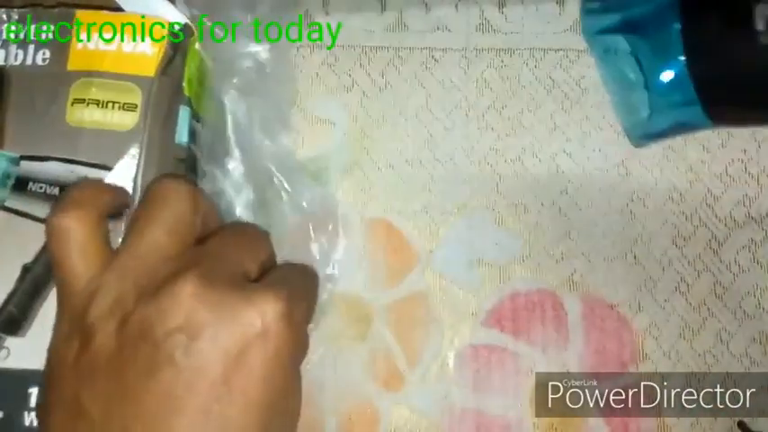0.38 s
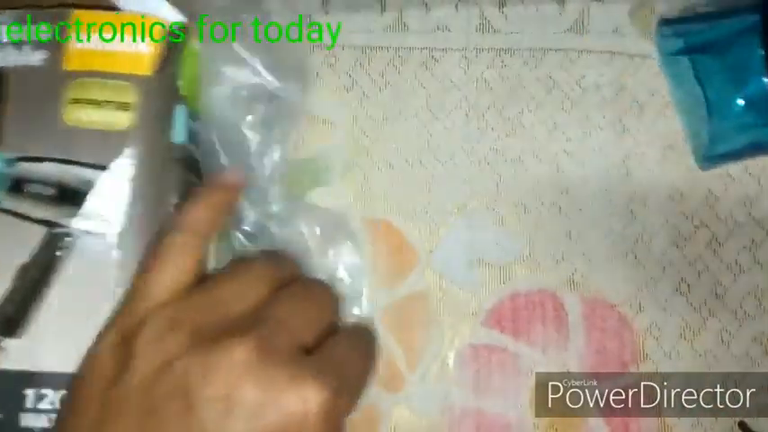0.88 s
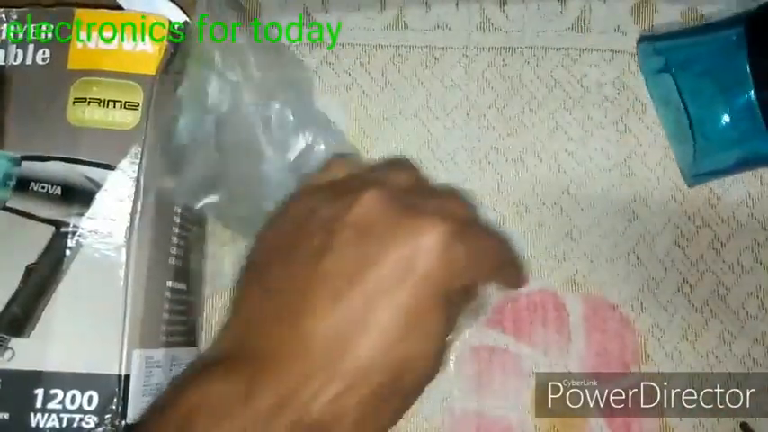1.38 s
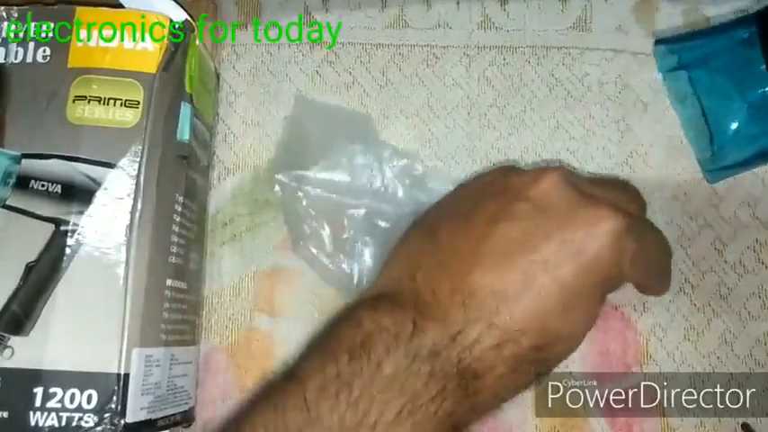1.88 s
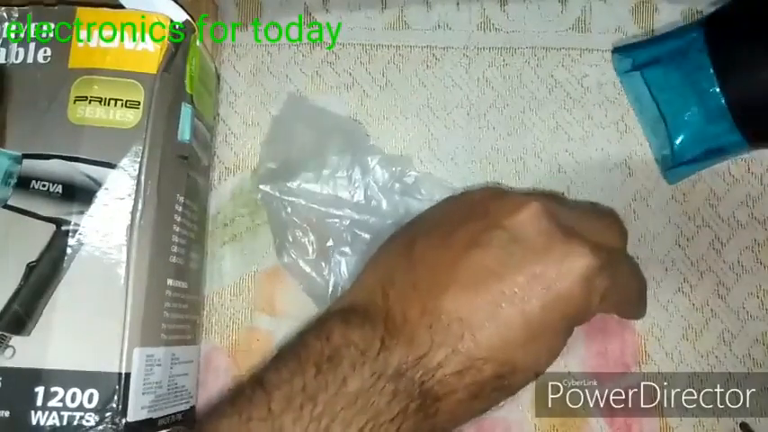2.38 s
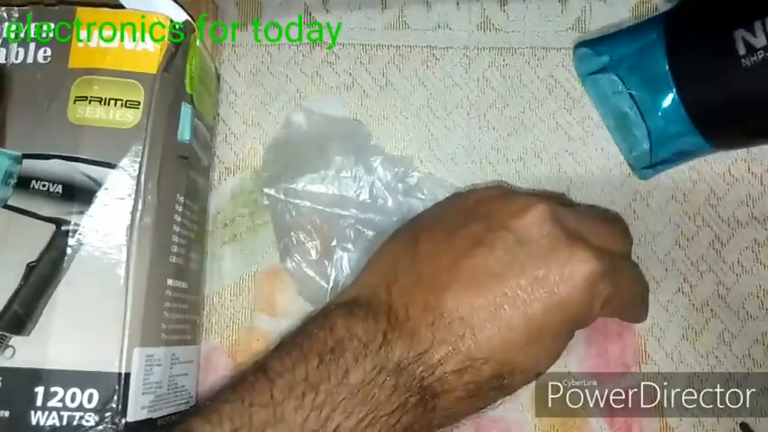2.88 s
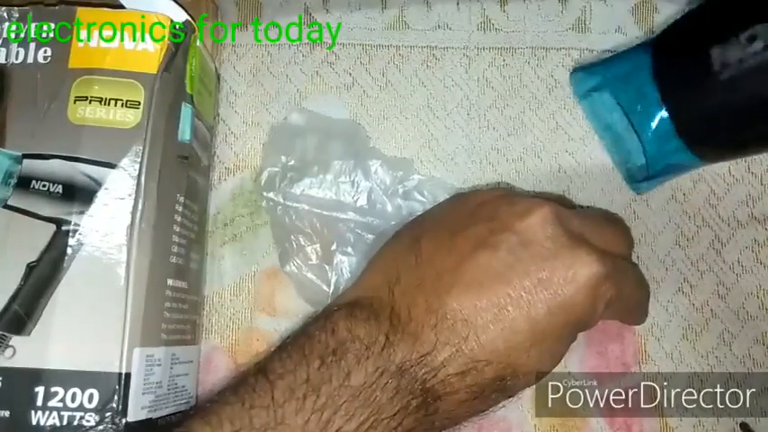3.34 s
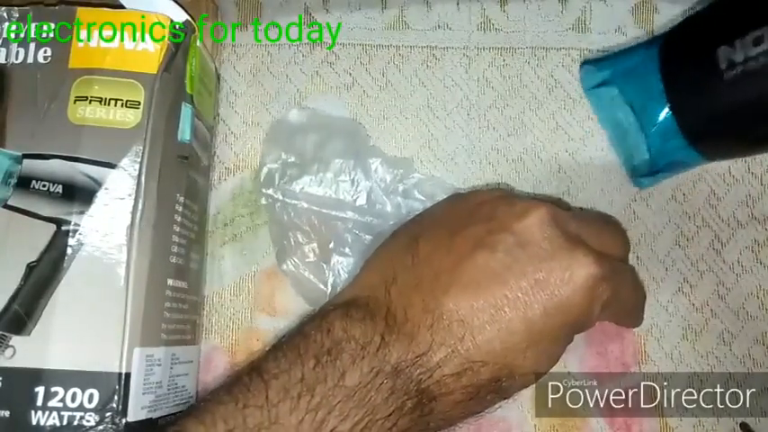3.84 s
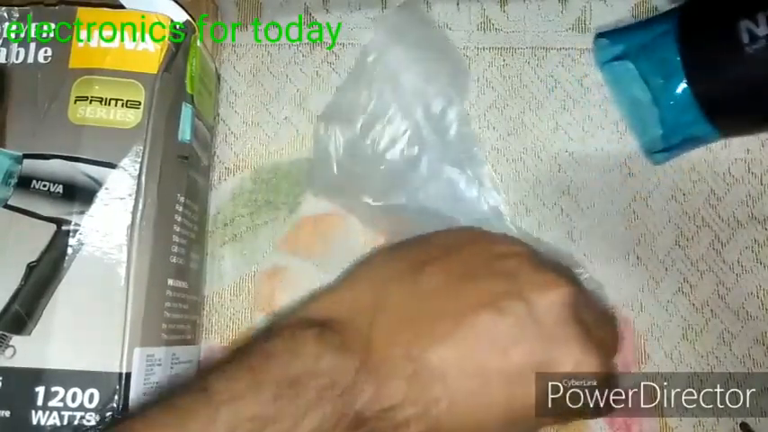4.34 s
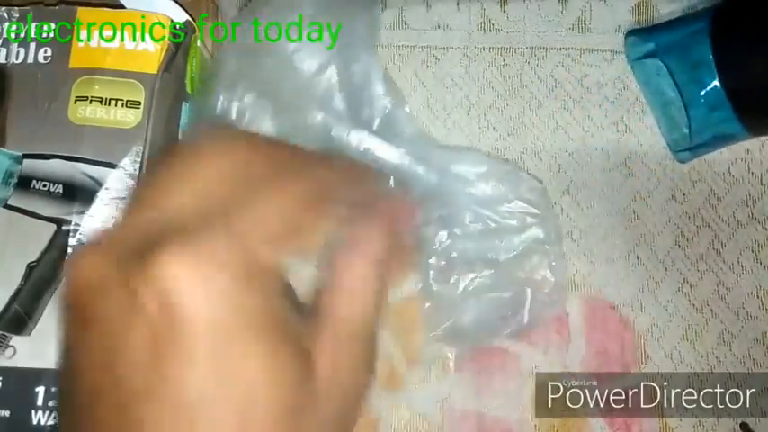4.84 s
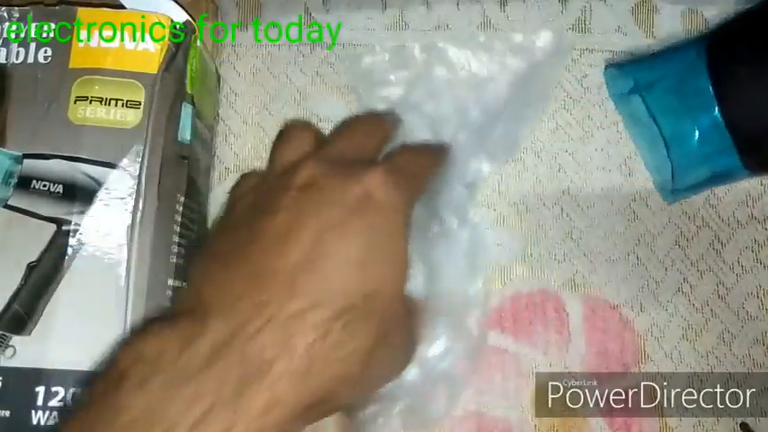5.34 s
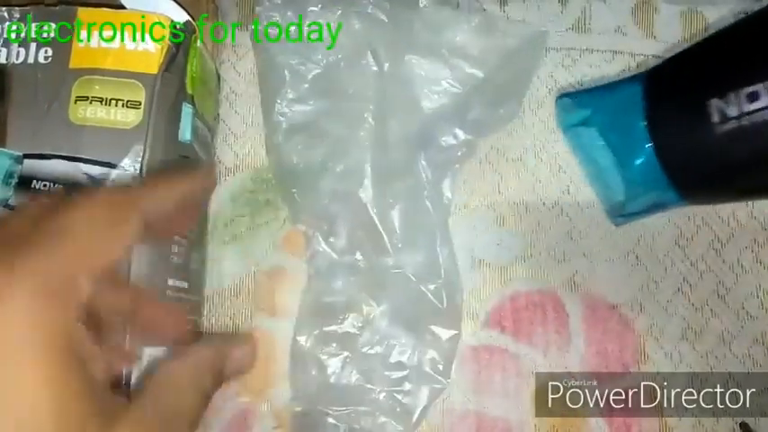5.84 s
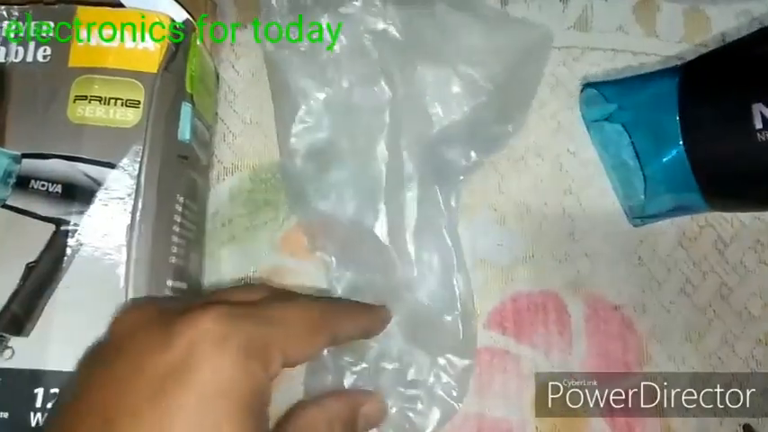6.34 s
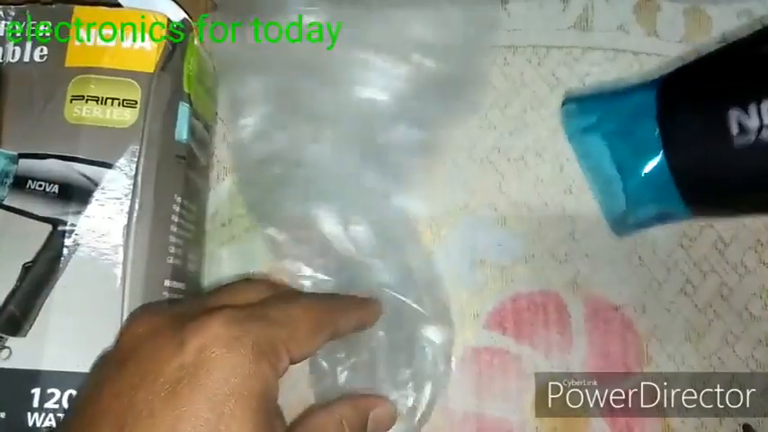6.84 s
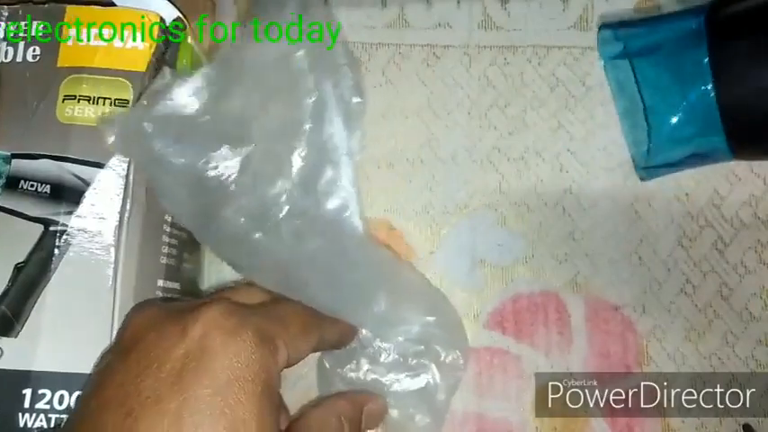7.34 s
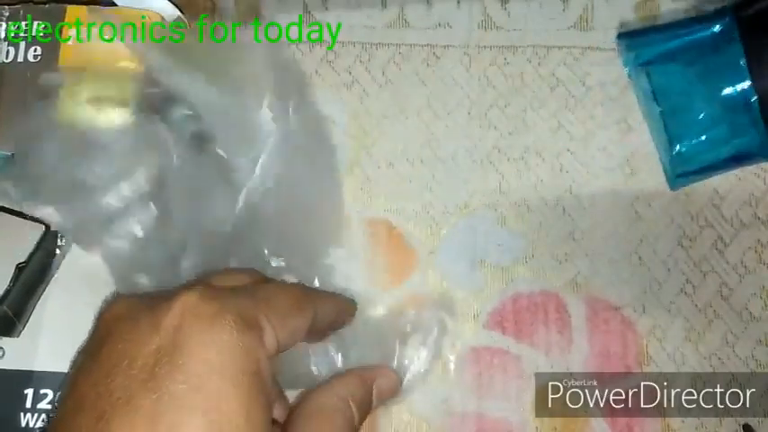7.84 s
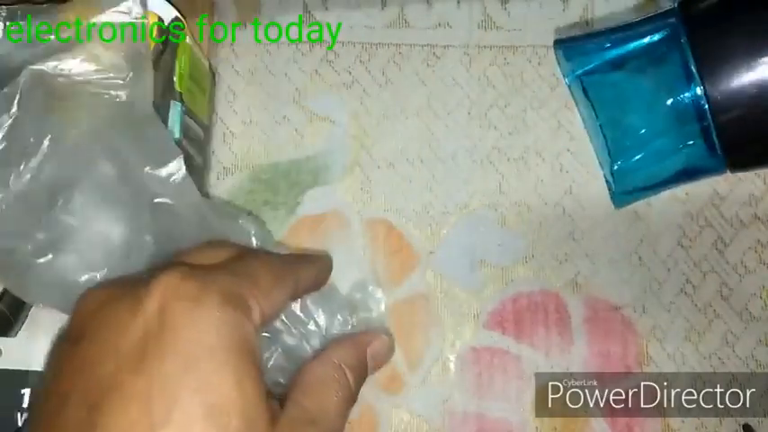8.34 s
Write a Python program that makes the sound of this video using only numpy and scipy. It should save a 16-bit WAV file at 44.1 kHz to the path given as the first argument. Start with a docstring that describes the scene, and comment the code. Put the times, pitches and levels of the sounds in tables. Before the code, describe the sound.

A hair dryer roars close by with a thin high whine, shuts off and winds down, plastic crinkles, then it clicks back on.

```python
"""Hair dryer and plastic bag

A hand-held hair dryer runs close to a two-port phone microphone in a small room, is switched off, coasts down,
and clicks on again. Fan speed drives shaft and blade tones and turbulent noise through barrel resonances.
In the pause a hand crumples a thin plastic bag: dense noise grains with snapping creases.
Low-noise gusts buffet the ports over a quiet room tone, faint hum and rumble."""
import sys
import numpy as np
from scipy import signal
from scipy.fft import rfft, irfft
from scipy.io import wavfile
from scipy.ndimage import uniform_filter1d, map_coordinates

SR = 44100
rng = np.random.default_rng(int(sys.argv[2]) if len(sys.argv) > 2 else 0)


def digitize_waveform(pressure):
    """Quantize a signal to 16-bit integers and store it at the path in sys.argv[1].

    Rows of a 2-D input are taken as channels; values are limited to [-1, 1].
    """
    field = np.atleast_2d(pressure).T
    bounded = np.clip(field, -1, 1)
    quanta = np.round(bounded * 32767).astype(np.int16)
    wavfile.write(sys.argv[1], SR, quanta)


def nominal_scale(level):
    """Amplitude ratio for a level in decibels (scalar or array-like)."""
    x = np.asarray(level, float) / 20
    return 10 ** x


N = 373086
TIME = np.arange(N) / SR

# the hand moves the dryer: (t/s, nearness/dB, nozzle turned to the phone/dB, fan blades in view of the phone/dB)
HAND = [(0, 2, -3, 4), (.5, 0, -3.5, -4), (1.2, -.5, 0.5, 0), (1.7, 0, -3, 2.5), (2.4, -1, 2, 4.5),
        (3.2, 0.5, -.5, 0.5), (3.8, -.5, 0, 1), (6.8, 0, 0, 0.5), (7.25, 0, 1, 3), (7.6, 0, -3, -2),
        (8.46, 0, -.5, -9)]
# colour of the plastic film: (f/Hz, relative level per Hz/dB)
BAG_COLOUR = [(350, -32), (600, -12.5), (1420, -11.5), (2590, -8.5), (3310, -10.5), (3750, -8), (6840, -9),
              (11000, -1.5), (15800, -10)]
# quiet room at the two ports: (f/Hz, likeness 0-1, left minus right/dB, left lead/ms)
ROOM_PORTS = [(60, 0.95, -1, 0.0065), (300, .8, .5, 0.0034), (700, 0.6, 0.95, 0), (2000, 0.2, 1.5, 0.0094)]


def on_log(table, hz):
    """Columns of a table, read on a log-frequency axis."""
    f, *columns = np.transpose(table)
    return [np.interp(np.log(hz + 1), np.log(f), c) for c in columns]


def level(x, db):
    """Scale to an rms level."""
    return x * nominal_scale(db) / np.sqrt(np.mean(x ** 2))


def sides(pan_db):
    """Left and right gains that differ by pan_db."""
    return nominal_scale(np.array([pan_db, -pan_db]) / 2)


def ports(x, other, table):
    """Right hears a late copy of left mixed with unrelated sound."""
    hz = np.arange(N // 2 + 1) * SR / N
    like, pan_db, lead_ms = on_log(table, hz)
    like = np.clip(like, 0, 1)
    left = rfft(x)
    late_copy = left * np.exp(-2j * np.pi * hz * lead_ms / 1000)
    right = like * late_copy + np.sqrt(1 - like ** 2) * rfft(other)
    return irfft(np.array([left, right]) * sides(pan_db), N)


def shape(x, gain_db, size=512):
    """Filter whose gain in dB depends on frequency and time."""
    overlap = size * 3 // 4
    hz, t, z = signal.stft(x, SR, nperseg=size, noverlap=overlap)
    z = z * nominal_scale(gain_db(hz[:, None], t))
    return signal.istft(z, SR, nperseg=size, noverlap=overlap)[1][..., :N]


def walk(rate):
    """Random levels held 1 / rate s and slewed twice, with a spread of 1."""
    k = int(SR / rate)
    held = np.repeat(rng.standard_normal(N // k + 1), k)
    v = uniform_filter1d(uniform_filter1d(held, k), k)[:N]
    return v / v.std()


def cells(hz, t, band_hz, hold_s, shared):
    """Smooth random field over frequency and time for each port, part of it common to both."""
    grid = rng.standard_normal((3, int(SR / 2 / band_hz) + 2, int(N / SR / hold_s) + 3))
    grid = np.sqrt(shared) * grid[0] + np.sqrt(1 - shared) * grid[1:]
    at = np.broadcast_arrays(hz / band_hz, t / hold_s)
    # 1.4 makes up for the spread lost between grid points
    return 1.4 * np.array([map_coordinates(g, at, order=1) for g in grid])


def low_noise(low_hz, high_hz, x):
    """Band of low noise at unit rms."""
    band = signal.butter(2, [low_hz, high_hz], "bandpass", fs=SR, output="sos")
    return level(signal.sosfilt(band, x), 0)


def speed():
    """Share of full fan speed: exponential run-up under power, slowed by air drag and friction when off."""
    # switch moves: (t/s, on 1 or off 0)
    moves = [(-.28, 1), (3.8, 0), (6.775, 1)]
    spin_up_s, coast_s = .13, .23
    brush_drag = .3  # share of full speed lost per second to brush friction
    share, now = np.zeros(N), 0.
    for (start, on), (end, _) in zip(moves, moves[1:] + [(N / SR, 0)]):
        during = (TIME >= start) & (TIME < end)
        t = np.append(TIME[during], end) - start
        if on:
            part = 1 - (1 - now) * np.exp(-t / spin_up_s)
        else:
            part = np.maximum(now / (1 + t / coast_s) - brush_drag * t, .01)
        share[during], now = part[:-1], part[-1]
    return share


def rush_of_air(share):
    """Turbulent noise through the barrel resonances, growing as a power of fan speed."""
    # overall colour: (f/Hz, relative level per Hz/dB)
    colour = [(60, -44), (140, -25.5), (240, -17), (400, -10.5), (620, -14.5), (1500, -9.5), (2600, -7),
              (4000, -5.5), (6000, -10), (9000, -7.5), (12000, -8.5), (15000, -10.5), (17000, -26.5)]
    # air resonances of barrel and housing, the last one a dip: (f/Hz, width/Hz, gain/dB)
    barrel = [(864.6, 159, 13.5), (1083, 296, 11.5), (1937, 210, 4), (2600, 450, 6.5), (3585, 77, 4.5),
              (4960, 63, 10), (5530, 200, 6), (6370, 200, 7.5), (7290, 190, 4.5), (9910, 230, 2.5),
              (10900, 1600, 4), (13300, 300, -4.5)]
    # amplitude grows with speed, steeper in the treble: (f/Hz, power)
    speed_law = [(300, 1.6), (1000, 2.11), (2500, 3.04), (10000, 3.2)]
    # the dryer at the two ports: (f/Hz, likeness 0-1, left minus right/dB, left lead/ms)
    air_ports = [(100, 0.17, 2.5, 0.069), (424, 0.93, 3.5, 0.021), (650, 0.2, 1.5, 0.15), (890, 1, 4, 0.23),
                 (1180, 0.94, 6.5, 0.18), (1660, 0.5, -2, 0.18), (2070, 0, 2.5, 0.26), (2570, 0, 4.5, 0.24),
                 (4170, 0.42, 1.5, 0.21), (6000, 0.29, 3.5, 0.29), (7500, 0.07, 2.5, 0.22),
                 (11000, .05, 5, 0.26), (15000, .05, 3.5, 0.18)]
    # shifting ripple of the colour, echoes off table and walls: (f/Hz, spread/dB)
    echo_ripple = [(1200, .5), (2000, 1.5), (3500, 2.2), (8000, 2.8), (15000, 2.8)]
    rush_db = -15  # rms over the whole scene, ahead of the hand's moves
    nozzle_hz, nozzle_width_hz = 2600, 440
    bright_db_per_octave = .5
    s, _, nozzle_db, _ = np.transpose(HAND)

    def air_db(hz, t):
        """Fixed colour, fan law, aim and echoes."""
        peaks = sum(db / (1 + (2 * (hz - f) / w) ** 2) for f, w, db in barrel)
        fan = 20 * on_log(speed_law, hz)[0] * np.log10(np.interp(t, TIME, share))
        tilt = bright_db_per_octave * np.log2((hz + 100) / 3000)
        aim = np.interp(t, s, nozzle_db) / (1 + (2 * (hz - nozzle_hz) / nozzle_width_hz) ** 2)
        ripple = on_log(echo_ripple, hz)[0] * cells(hz, t, 170, .45, .4)
        return on_log(colour, hz)[0] + peaks + fan + tilt + aim + ripple

    eddies = rng.standard_normal((2, N)) * nominal_scale(.5 * walk(40))
    return level(shape(ports(*eddies, air_ports), air_db, size=1024), rush_db)


def whine(share):
    """Sine tones at multiples of shaft speed, rising steeply with fan speed."""
    # tones: (multiple of shaft speed, rms level at full speed ahead of the hand's moves/dB,
    #         left minus right/dB, left lead/s)
    tones = [(1, -37, 2.5, 0), (5, -50.5, 2, 0.00079), (6, -34, 11.5, 0.0096)]
    # full shaft speed, and how much lower it lies on a cold motor
    full_speed_hz, cold_drop_hz, warm_up_s = 392.2, 4, 2
    s, _, _, blade_db = np.transpose(HAND)
    warm_hz = full_speed_hz - cold_drop_hz * np.exp(-TIME / warm_up_s)
    shaft_hz = share * warm_hz * (1 + .0005 * walk(25))
    turns = np.cumsum(shaft_hz) / SR
    blades_db = np.interp(TIME, s, blade_db)
    total = np.zeros((2, N))
    for multiple, db, pan_db, lead_s in tones:
        # the view of the blades leaves the shaft tone alone
        gain = nominal_scale(db + (multiple > 1) * blades_db + 1.2 * walk(9)) * np.sqrt(2)
        port_turns = turns - np.outer([0, lead_s], shaft_hz)
        total += sides(pan_db)[:, None] * gain * np.sin(2 * np.pi * multiple * port_turns)
    return total * share ** 6.4


def dryer():
    """Air rush and whine share one fan speed, and swell and sway as the hand moves the dryer."""
    share = speed()
    s, near_db, _, _ = np.transpose(HAND)
    sway_db = -.1 * walk(1.6)
    return (rush_of_air(share) + whine(share)) * nominal_scale(np.interp(TIME, s, near_db)) * sides(sway_db)


def thumps():
    """Low noise, unrelated at the two ports, stronger on the right."""
    return low_noise(20, 85, rng.standard_normal((2, N))) * sides(-6)[:, None]


def buffet():
    """Gusty low thumps of the air stream, growing with the fourth power of fan speed."""
    gust_db = -52 + 3.7 * np.array([walk(4.3), walk(10)])
    return thumps() * nominal_scale(gust_db) * speed() ** 4


def room_tone():
    """Quiet broadband noise with faint hum bands, partly alike at the two ports."""
    # (f/Hz, relative level per Hz/dB)
    colour = [(50, -13), (80, -9.5), (120, 0.5), (170, -19), (210, 2), (260, -9.5), (310, -4), (380, -17.5),
              (500, -9.5), (620, -24), (780, -16), (1000, -21.5), (2000, -27.5), (4000, -36),
              (10000, -39.5), (15500, -37)]
    noise = ports(*rng.standard_normal((2, N)), ROOM_PORTS)
    return level(shape(noise, lambda hz, t: on_log(colour, hz)[0], size=2048), -58)


def room_hum():
    """Faint sines that waver in level and pitch."""
    # (f/Hz, rms level around which it wavers/dB)
    tones = [(98, -71.5), (204.6, -72.5), (243, -76.5), (296, -70), (441, -79), (490, -78), (538, -79.5)]
    total = np.zeros(N)
    for hz, db in tones:
        cycles = hz * np.cumsum(1 + .006 * walk(6)) / SR
        total += nominal_scale(db + 1.8 * walk(4.1)) * np.sqrt(2) * np.sin(2 * np.pi * cycles)
    return total


def phone_rumble():
    """Low rumble of the phone in the hand, weaker while the dryer runs."""
    rumble_db, running_db, wander_db = -50.5, -2, .5
    low = low_noise(15, 55, ports(*rng.standard_normal((2, N)), ROOM_PORTS))
    return low * nominal_scale(rumble_db + running_db * speed() + wander_db * walk(3.6))


def grip(start, peak, end, db, sag):
    """Level of the film through one move: starts at once, swells to its peak, dies when the hand lets go."""
    swell_db = 8 * np.clip((peak - TIME) / (peak - start), 0, 1)
    let_go_db = 200 * np.maximum(TIME - end, 0)
    fall_db = sag * np.maximum(TIME - peak, 0) + let_go_db
    return (TIME >= start) * nominal_scale(db - swell_db - fall_db)


def hand_effort():
    """Summed power of the hand's moves, over film that keeps creeping between them."""
    # moves on the bag: (start t/s, peak t/s, end t/s, peak level/dB, sag after the peak/dB per s)
    grips = [(4.1, 4.12, 4.68, -46, 4), (4.42, 4.5, 4.56, -43, 40), (4.68, 4.7, 4.92, -55, 12),
             (4.928, 4.935, 5.1, -44, 5), (4.98, 5.055, 5.11, -39, 40), (5.1, 5.18, 5.3, -31, 45),
             (5.25, 5.3, 5.8, -39.5, 19), (5.8, 5.82, 6.06, -52, 35), (6.232, 6.236, 6.47, -47.5, 12),
             (6.64, 6.76, 6.78, -54, 5)]
    settle_db = -63
    moves = sum(grip(*move) ** 2 for move in grips)
    handled = (TIME > grips[0][0]) & (TIME < grips[-1][2])
    return np.sqrt(moves + handled * nominal_scale(settle_db) ** 2)


def film_rustle(effort):
    """Dense tiny crackles: noise whose level jumps at every sample, swelling with each move of the hand."""
    low_db, pan_db = -2.5, .5
    crackle_db = 1.8 * rng.exponential(size=N) + 2.1 * walk(150) + 1.1 * walk(30)
    grains = rng.standard_normal((2, N)) * nominal_scale(crackle_db)

    def film_db(hz, t):
        """Film colour with the lows eased down."""
        return on_log(BAG_COLOUR, hz)[0] + low_db / (1 + (hz / 2600) ** 4)

    return level(shape(grains, film_db, size=256), 0) * effort * sides(pan_db)[:, None]


def crease_snaps(effort):
    """Small random ticks and the loudest creases: short noise bursts that die away exponentially."""
    # creases that snap loudest: (t/s, burst level at its start ahead of the colour/dB, left minus right/dB)
    creases = [(4.9297, -35, -.5), (5.0429, -28.5, 1), (5.8227, -38, 1), (5.8396, -36, -1),
               (5.8995, -38, .5), (5.9584, -43, 0), (6.0292, -39, 1), (6.0492, -43, 0), (6.2357, -31, 2),
               (6.342, -34, 0), (6.3759, -33, 1.5), (6.3939, -36, 1.5), (6.7545, -32, -.5)]
    ticks_per_s, tick_over_film_db, tick_spread_db = 90, 5, 3.5
    bright_db_per_octave = 2.5
    t = np.arange(SR // 100) / SR
    fade = np.exp(-t / .0014)
    tick_gain = nominal_scale(tick_over_film_db + tick_spread_db * rng.standard_normal(N))
    ticks = (rng.random(N) < ticks_per_s / SR) * effort * tick_gain
    # overlapping ticks add in power
    tick_level = np.sqrt(np.abs(signal.fftconvolve(ticks ** 2, fade ** 2)[:N]))
    snaps = tick_level * rng.standard_normal((2, N))
    for at, db, pan_db in creases:
        i = int(at * SR)
        burst = rng.standard_normal((2, len(t))) * fade
        snaps[:, i:i + len(t)] += sides(pan_db)[:, None] * nominal_scale(db) * burst

    def snap_db(hz, t):
        """Film colour, lifted and tilted to the treble."""
        return on_log(BAG_COLOUR, hz)[0] + 4 + bright_db_per_octave * np.log2((hz + 100) / 9000)

    return shape(snaps, snap_db, size=128)


def bag():
    """Thin plastic film rustles under the moving hand, and its creases snap."""
    effort = hand_effort()
    return film_rustle(effort) + crease_snaps(effort)


def ring(kicks, modes):
    """Kicks through decaying sine modes, their sum scaled to a peak of 1."""
    t = np.arange(SR // 8) / SR
    body = sum(nominal_scale(db - 60 * t / t60) * np.sin(2 * np.pi * hz * t) for hz, db, t60 in modes)
    return signal.fftconvolve(kicks, body / np.abs(body).max())[:N]


def switch():
    """The slider rattles over its detent: a dry crack that briefly rings the handle."""
    # modes of the handle shell: (f/Hz, relative level/dB, 60 dB decay/s)
    shell = [(830, -2, .024), (1550, -3, .014), (1900, -3, .012), (2500, -7, .01), (3560, -5, .008),
             (4150, 0, .008), (4600, 0, .008), (5400, -8, .007), (8100, -8, .006), (11100, -1, .005),
             (13500, -6, .004)]
    # first touch, hardest blow one step later, then fading bounces
    slider_s, blow_db, touch_db, bounce_s, bounce_db = 6.7727, -13, -8, .00095, -3.5
    step = np.arange(5)
    late = step * bounce_s * (1 + .12 * rng.standard_normal(len(step)))
    kicks = np.zeros(N)
    kick_db = blow_db + np.where(step, (step - 1) * bounce_db, touch_db)
    kicks[((slider_s + late) * SR).astype(int)] = nominal_scale(kick_db)
    t = np.arange(SR // 100) / SR
    burst = rng.standard_normal((2, len(t))) * np.exp(-t / .0006)
    crack = signal.fftconvolve(kicks[None], burst, axes=1)[:, :N]
    # a small shell radiates no bass
    thin = signal.butter(4, 700, "highpass", fs=SR, output="sos")
    return sides(2.5)[:, None] * signal.sosfilt(thin, ring(kicks, shell) + nominal_scale(-4) * crack)


def puff():
    """The stream sweeps once across the phone: one strong gust of low noise."""
    at_s, length_s, peak_db = 7.35, .045, -33
    return thumps() * nominal_scale(peak_db) * np.exp(-((TIME - at_s) / length_s) ** 2)


def dropouts(depth, field, edge):
    """Gain in dB: cells beyond the edge lose level, down to the full depth."""
    return -depth * np.clip(3 * (field - edge), 0, 1)


def patchy_lows(mix):
    """The lows come and go in patches while the dryer is loud."""
    # (f/Hz, depth at full fan speed/dB)
    depths = [(30, 34), (230, 34), (340, 0), (450, 6), (620, 20), (780, 0)]
    loud = speed() ** 3

    def patch_db(hz, t):
        """Patches that deepen with fan speed."""
        depth = np.interp(t, TIME, loud) * on_log(depths, hz)[0]
        return dropouts(depth, cells(hz, t, 170, .04, .85), .2)

    return shape(mix, patch_db, size=1024)


def flickering_bands(mix):
    """Narrow bands drop out for a moment, mostly at both ports together."""
    # (f/Hz, depth/dB)
    depths = [(1900, 0), (2900, 22), (8500, 22), (9500, 4), (12000, 12), (15000, 22)]

    def flicker_db(hz, t):
        """Sparse cells of lost level."""
        return dropouts(on_log(depths, hz)[0], cells(hz, t, 140, .055, .9), 1.2)

    return shape(mix, flicker_db, size=1024)


def scene():
    """Everything at the two microphone ports; switch and puff skip the dropouts."""
    mix = dryer() + buffet() + room_tone() + room_hum() + phone_rumble() + bag()
    mix = flickering_bands(patchy_lows(mix))
    return mix + switch() + puff()


def roll_off(x):
    """The treble ends steeply here."""
    return signal.sosfilt(signal.butter(12, 15900, fs=SR, output="sos"), x)


def record(dry):
    """The phone cuts the top with a steep low-pass."""
    top = signal.ellip(8, .3, 50, 15450, fs=SR, output="sos")
    mix = signal.sosfilt(top, dry)
    return roll_off(mix)


dry = scene()
out = record(dry)
digitize_waveform(out)
```